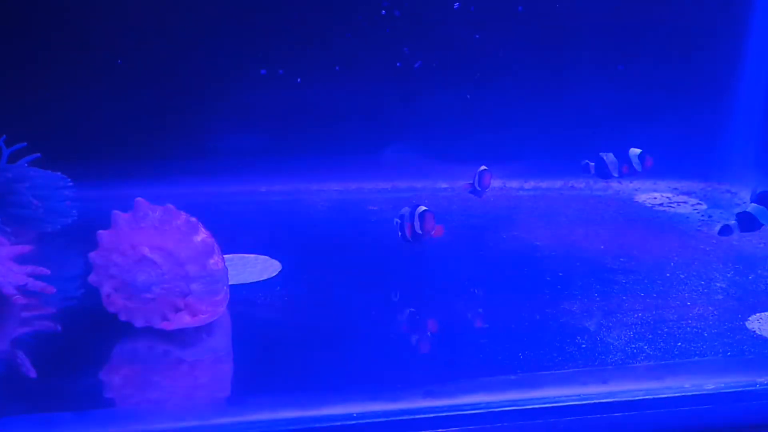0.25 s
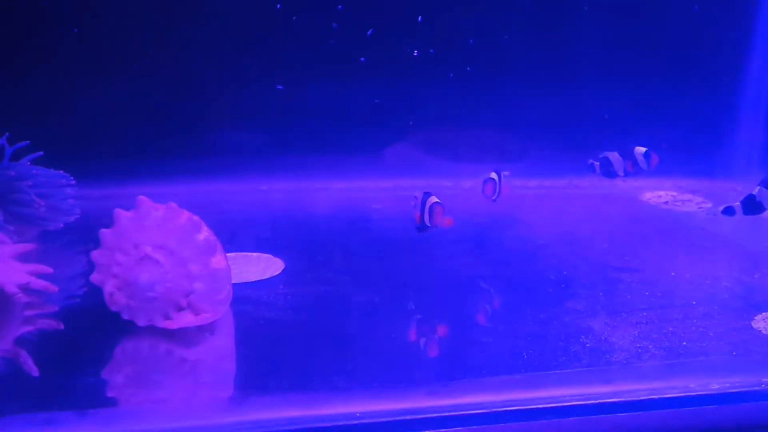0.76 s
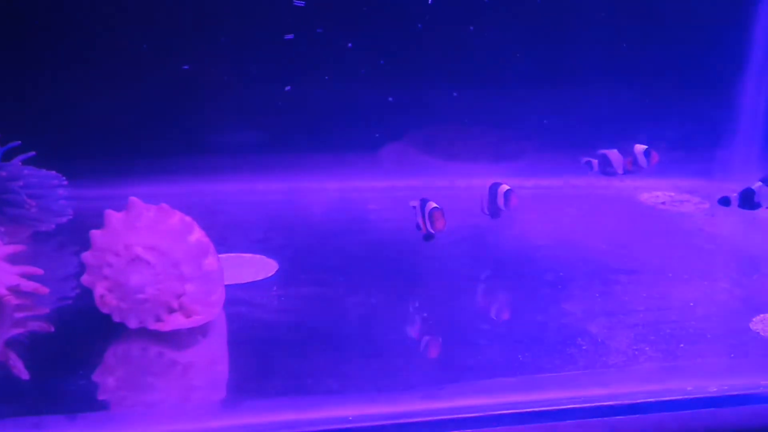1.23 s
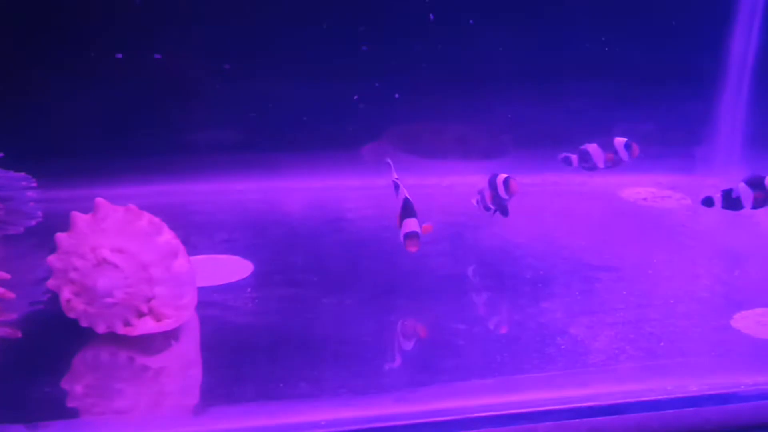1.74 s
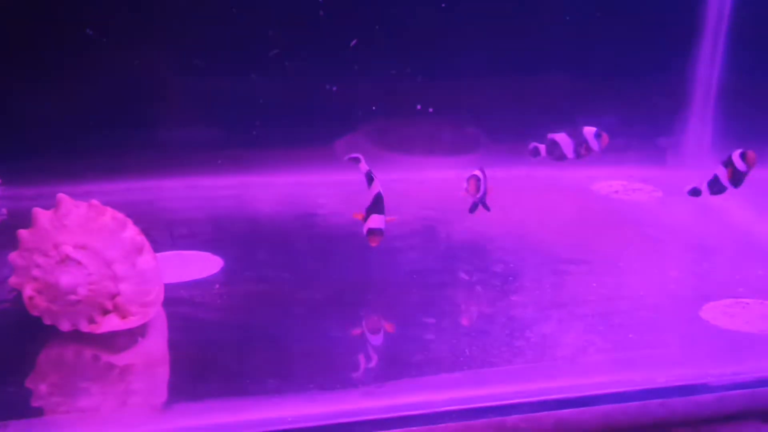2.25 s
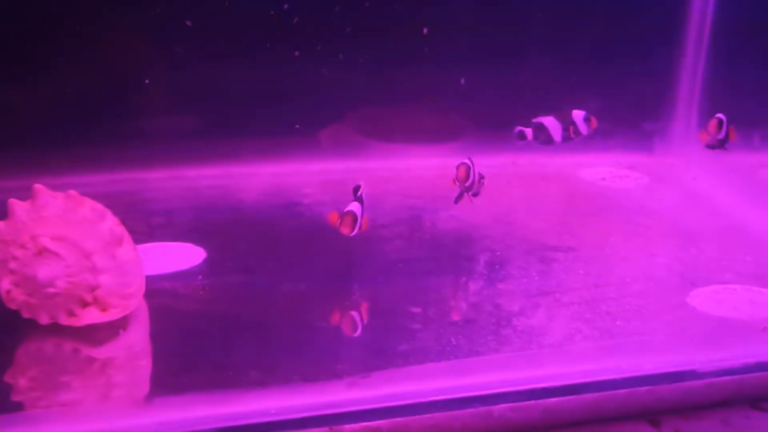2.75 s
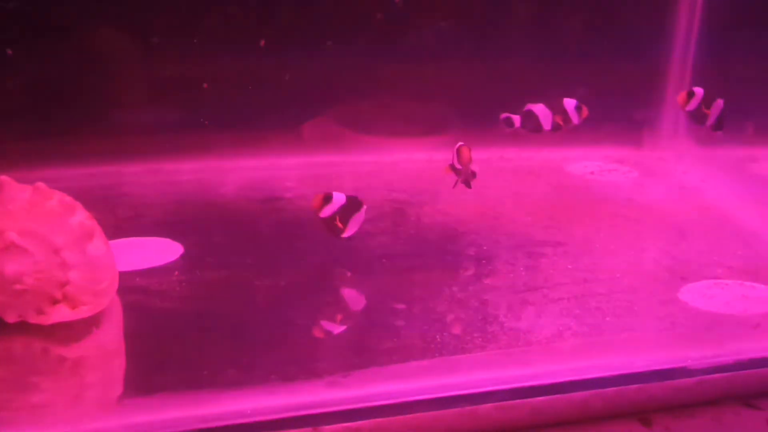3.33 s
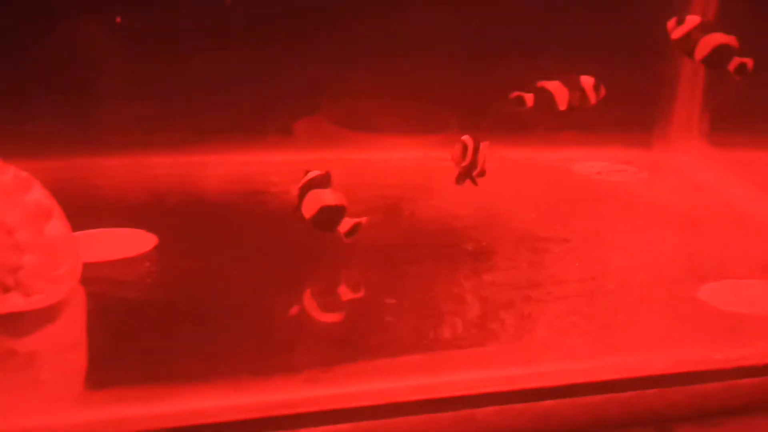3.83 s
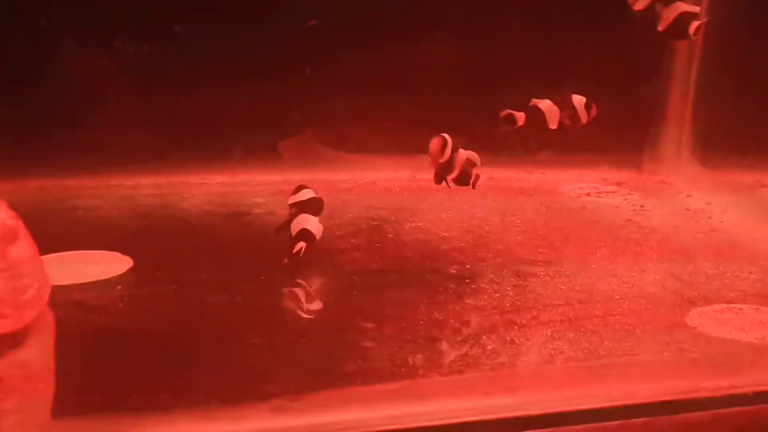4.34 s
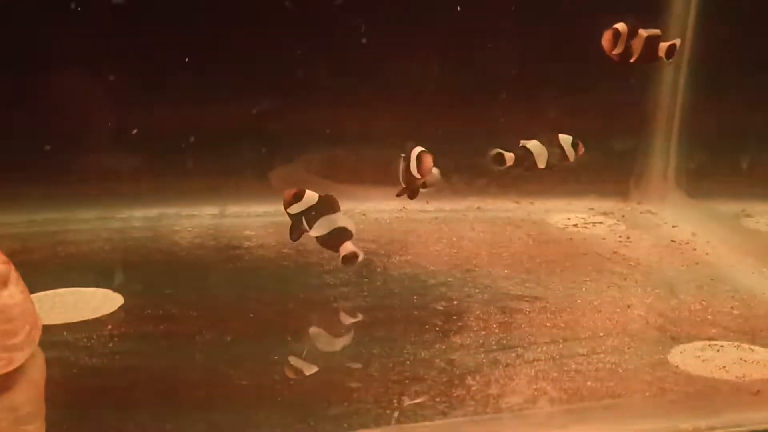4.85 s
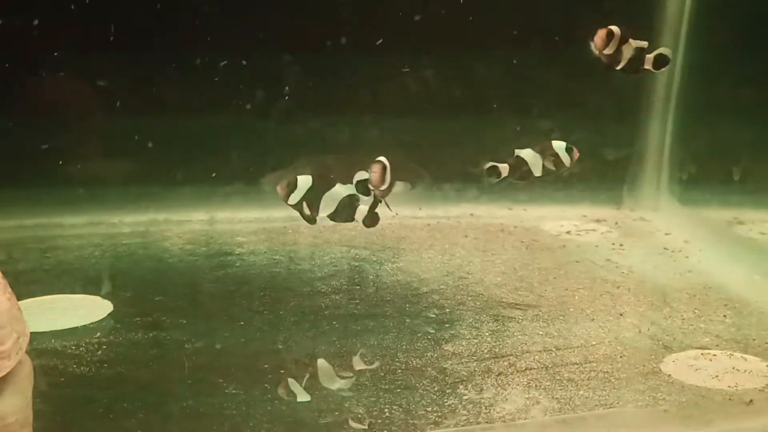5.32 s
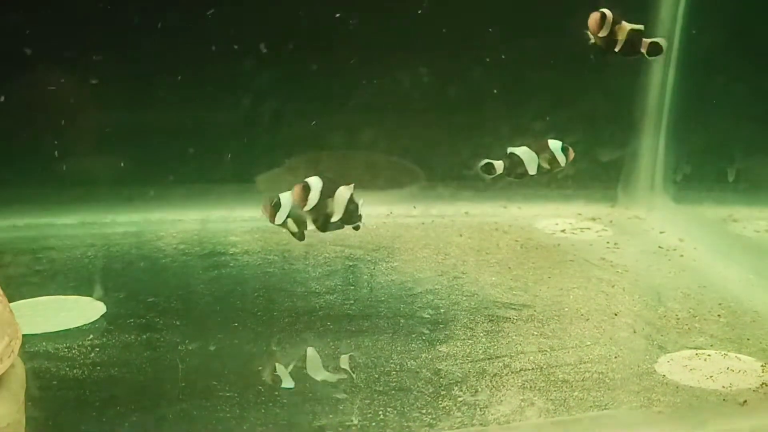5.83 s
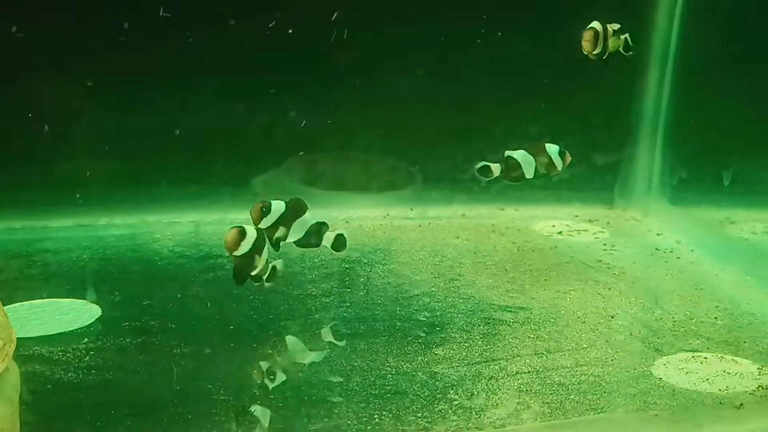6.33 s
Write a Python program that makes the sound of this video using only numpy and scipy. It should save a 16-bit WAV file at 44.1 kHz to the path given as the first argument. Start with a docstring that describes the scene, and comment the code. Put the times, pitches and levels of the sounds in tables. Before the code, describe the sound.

An aquarium pump hums steadily under rushing water, with a thin fluttering high whine, fizzing spray and small bubbles plinking close to the glass.

```python
"""An aquarium in a quiet room, heard close to the glass by one microphone.
From the start a pump and a slower motor hum in steady sines, under filtered noise for rushing water and fizz.
The water's rush and wash open strong and ease at once; small bubbles ping, and gurgles swell as bands of noise.
A thin resonant whine opens soft, its throb deepening over the first seconds; the loudest spray tick snaps at 1.1 s.
The wash slowly sinks as the fizz thickens in spits, the strongest of them at 6.3 s."""
import sys
import numpy as np
from scipy import signal
from scipy.fft import rfft, irfft
from scipy.io import wavfile

SR = 44100
rng = np.random.default_rng(int(sys.argv[2]) if len(sys.argv) > 2 else 0)


def wav_record(signal):
    """Record a signal, one row per channel, as 16-bit PCM in the file named by sys.argv[1]."""
    frames = np.transpose(np.atleast_2d(signal))
    bounded = np.clip(frames, -1, 1)
    # unit amplitude maps onto the largest positive 16-bit level
    quanta = np.round(bounded * 32767).astype(np.int16)
    wavfile.write(sys.argv[1], SR, quanta)


N = 290178
T = np.arange(N) / SR  # s
HZ = np.fft.rfftfreq(N, 1 / SR)


def amp(db):
    """Decibels to gain."""
    return 10 ** (np.asarray(db) / 20)


def evened(x):
    """Scales to rms 1."""
    return x / np.sqrt(np.mean(x ** 2) + 1e-20)


def spectrum(points):
    """Gain at every frequency, drawn through (Hz, dB) points on a log-frequency axis."""
    hz, db = np.transpose(points)
    return amp(np.interp(np.log(HZ + 1), np.log(hz), db))


def noise(gain):
    """White noise shaped to the given amplitude per root Hz."""
    return irfft(rfft(rng.standard_normal(N)) * gain, N) * np.sqrt(SR / 2)


def drift(rate):
    """Random wander of rms 1, rolled off steeply above rate [Hz]."""
    return evened(noise((HZ > 0) / (1 + (HZ / rate) ** 4)))


def settle(time_s):
    """Falls exponentially from 1 at the start towards 0."""
    return np.exp(-T / time_s)


def add(mix, s, sound):
    """Adds a sound at time s, cut off at the end of the mix."""
    part = mix[max(round(s * SR), 0):][:len(sound)]
    part += sound[:len(part)]


def room(x, wet_db, t60):
    """Direct sound plus dense reflections from the glass and the walls, dying by 60 dB in t60 [s]."""
    t = T[:SR // 2]
    signs = rng.choice([-1., 1.], len(t))
    taps = signs * (rng.random(len(t)) < .2) * (t > .001)
    tail = taps * np.exp(-np.log(1000) * t / t60)
    tail /= np.linalg.norm(tail)
    return x + amp(wet_db) * signal.fftconvolve(x, tail)[:N]


def tone(turns, db):
    """A sine of the given rms level and random phase, following a count of turns."""
    return np.sqrt(2) * amp(db) * np.sin(2 * np.pi * (turns + rng.random()))


# harmonics of the pump hum: (multiple of the mains, mean level [dB])
PUMP = [(1, -64), (2, -54.5), (3, -51), (4, -43), (5, -59.5), (6, -65), (12, -67)]


def pump():
    """Hum locked to the mains, its level wavering very slightly."""
    mains_hz = 60.135
    hum = sum(tone(k * mains_hz * T, db) for k, db in PUMP)
    return hum * amp(0.1 * drift(rate=1.8))


# harmonics of the motor buzz: (multiple of the shaft speed, level [dB])
MOTOR = [(3, -59), (4, -66), (6, -73), (8, -71), (10, -71), (11, -75), (12, -71), (13, -71), (14, -69),
         (16, -68), (17, -69), (18, -76), (19, -83), (20, -82), (21, -76), (24, -83), (29, -81), (30, -81),
         (32, -82), (33, -80), (36, -84), (37, -79), (38, -84), (40, -74), (41, -81), (42, -74), (43, -80),
         (47, -79), (48, -81), (52, -82)]


def motor():
    """Faint buzz of a slower motor: all harmonics follow one shaft, slightly unsteady in speed."""
    shaft_hz = 47.92 * (1 + 0.00011 * drift(rate=1.0))
    shaft_turns = np.cumsum(shaft_hz) / SR
    return sum(tone(k * shaft_turns, db) for k, db in MOTOR)


# weak tones close to machine harmonics: (pitch [Hz], level [dB])
BEATS = [(58.39, -70.5), (144.68, -65)]


def beats():
    """Weak steady sines that beat slowly against their neighbours."""
    return sum(tone(hz * T, db) for hz, db in BEATS)


# water driven through pipes and tank: (frequency [Hz], density before trim and easing [dB per Hz])
FLOW = [(20, -106), (60, -92.5), (133, -80), (160, -82.5), (185, -77), (275, -78.5), (315, -85.5),
        (430, -83), (510, -90.5), (610, -90), (690, -79), (850, -89), (1000, -98), (1600, -115)]


def flow():
    """Low rush of water as shaped noise, easing from a stronger start."""
    level_db = 0.15 + 5 * settle(time_s=0.39)
    return noise(spectrum(FLOW)) * amp(level_db)


# wash of the moving surface: (frequency [Hz], density before room, trim and easing [dB per Hz])
WASH = [(300, -115), (950, -91), (1230, -99), (1430, -90.5), (1650, -92), (2000, -93), (2400, -95),
        (4700, -97), (5900, -101), (8500, -106), (10000, -114), (15500, -116)]


def wash():
    """Gently swelling noise coloured by the glass box; eases from its start, then keeps sinking."""
    swelling = noise(spectrum(WASH)) * amp(1.3 * drift(rate=5.1))
    sag_db_per_s = 0.19
    level_db = -2.0 + 3.5 * settle(time_s=0.19) - sag_db_per_s * T
    return amp(level_db) * room(swelling, wet_db=-5.0, t60=0.06)


# resonances: (centre [Hz], width between points about 5 dB down [Hz], peak density before trim [dB per Hz])
WHINE = [(7020, 403, -82.5), (7340, 378, -82), (8010, 540, -97), (14900, 2700, -108)]


def whine():
    """Hiss held in two close resonances, a shoulder and an octave above, throbbing about nine times a second."""
    gain = 0
    for hz, width, db in WHINE:
        offset = 2 * (HZ - hz) / width
        gain = gain + amp(db) / (1 + offset ** 2 * (np.sqrt(2) - 1)) ** 1.75
    throb_hz = 9.4 + 0.71 * drift(rate=0.52)
    throb_turns = np.cumsum(throb_hz) / SR
    depth_db = 2 * (1 - settle(time_s=0.97))
    throb_db = depth_db * np.cos(2 * np.pi * throb_turns)
    # soft start, then settles
    level_db = 1.0 - 2.5 * settle(time_s=2.9)
    return noise(gain) * amp(level_db + throb_db + .5 * drift(rate=66))


# fizz of the finest spray: (frequency [Hz], density before trim, rise and flicker [dB per Hz])
FIZZ = [(3000, -120), (7000, -104), (8400, -100), (9800, -111), (12600, -109.5), (13600, -101.5),
        (15400, -101)]
# strongest spits: (time [s], power added at onset, relative to the density above [dB])
SPITS = [(1.728, 4), (2.423, 5), (2.779, 3), (3.99, 7.5), (4.639, 5), (5.067, 4), (6.345, 14)]


def fizz():
    """Flickering high noise that slowly thickens, briefly lifted by dying spits of spray."""
    rise_db_per_s = 0.43
    flicker_db = 2.25 * drift(rate=22) + 1.6 * drift(rate=100)
    power = amp(-1.84 + rise_db_per_s * T + flicker_db) ** 2
    for s, db in SPITS:
        add(power, s, (amp(db) * settle(time_s=0.078)) ** 2)
    return noise(spectrum(FIZZ)) * np.sqrt(power)


def ping(hz, t60, rise):
    """A bubble rings briefly, its pitch rising by the share rise as it nears the surface."""
    t = T[:SR // 16]
    age = np.minimum(t / t60, 1)
    turns = np.cumsum(hz * (1 + rise * age)) / SR
    envelope = np.exp(-np.log(1000) * t / t60) * (1 - np.exp(-t * hz))
    return np.sin(2 * np.pi * turns) * envelope


def swarm(low_hz, high_hz, per_s, spread_db, t60, count):
    """Bubbles at random times on count pitches, a few much louder than the rest; rms 1 overall."""
    out = np.zeros(N)
    for hz in np.geomspace(low_hz, high_hz, count):
        size = amp(spread_db * np.minimum(rng.exponential(1, N), 3))
        births = size * (rng.random(N) < per_s / count / SR)
        out += signal.oaconvolve(births, ping(hz, t60, rise=0.025))[:N]
    return evened(out)


def small_bubbles():
    """A crowd of soft, very short pings, mostly heard through reflections."""
    small = amp(-70.5) * swarm(2400, 5420, per_s=110, spread_db=4.0, t60=0.0031, count=30)
    return room(small, wet_db=6.5, t60=0.36)


def burst(s, hz, width_hz):
    """A tick: a few cycles under a bell-shaped envelope, shorter when wider."""
    t = T - s
    return np.cos(2 * np.pi * hz * t) * np.exp(-np.minimum((2 * width_hz * t) ** 2, 50))


# sharp ticks of bursting spray: (time [s], peak level before room [dB], pitch [Hz], width [Hz])
TICKS = [(1.109, -28, 8100, 1310), (1.1152, -41, 8260, 1110), (1.4212, -45, 8200, 700),
         (2.4009, -43, 7900, 900), (4.8314, -41, 14400, 1800), (4.9945, -43, 14500, 1800),
         (5.7359, -40, 14500, 1600), (6.0282, -42, 8000, 800), (6.345, -36, 11800, 4500)]


def spray_ticks():
    """The tiniest bubbles burst: a swarm of very high pings, joined by single sharp ticks."""
    out = amp(-79) * swarm(7150, 8200, per_s=44, spread_db=8, t60=0.0089, count=6)
    out += sum(amp(db) * burst(s, hz, width_hz) for s, db, hz, width_hz in TICKS)
    return room(out, wet_db=3.5, t60=0.43)


def gurgle(centre_hz):
    """Many like-sized bubbles blur into a narrow band of noise that swells and dies away."""
    t = T[:SR // 3]
    width, attack_s, decay_s = 0.15, 0.0021, 0.12  # width as a share of the pitch
    offset = np.fft.rfftfreq(len(t), 1 / SR) / centre_hz - 1
    band = 1 / (1 + (offset / width) ** 2)
    envelope = (1 - np.exp(-t / attack_s)) * np.exp(-t / decay_s)
    return envelope * evened(irfft(rfft(rng.standard_normal(len(t))) * band, len(t)))


def trickle():
    """Soft gurgles follow one another loosely, one at a random moment in each equal slot."""
    out = np.zeros(N)
    slots_per_s = 3.3
    for k, (lag, size, pitch) in enumerate(rng.random(size=(40, 3))):
        hz = 3800 + 1100 * pitch
        level_db = -62.25 + size
        add(out, (k + lag) / slots_per_s, amp(level_db) * gurgle(hz))
    return out


# clearest single bubbles: (time [s], level before ping envelope and room [dB], starting pitch [Hz])
BUBBLES = [(.195, -48.5, 2750), (1.301, -50.5, 2820), (2.1518, -44.5, 1590), (2.416, -41.5, 1930),
           (2.6188, -44, 2690), (3.022, -48, 4270), (3.412, -49, 2930), (4.9137, -43.5, 3030),
           (5.0782, -49, 2490), (5.224, -50, 3170), (5.819, -48, 2940)]


def large_bubbles():
    """Plinks of larger bubbles, which ring longer and sound nearer."""
    large = np.zeros(N)
    for s, db, hz in BUBBLES:
        add(large, s, amp(db) * ping(hz, t60=0.035, rise=0.05))
    return room(large, wet_db=1.0, t60=0.41)


# loudest gurgles, each a cluster of bubbles: (time [s], rms level before envelope [dB], centre [Hz])
GURGLES = [(.929, -61, 4720), (1.721, -55.5, 4370), (2.495, -60, 5600), (2.7, -56.5, 3680),
           (2.905, -57, 4800), (3.207, -59, 4100), (4.235, -56.5, 4020), (5.565, -60, 4020),
           (5.795, -56, 4600)]


def loud_gurgles():
    """Louder clusters of bubbles stand out from the trickle."""
    out = np.zeros(N)
    for s, db, hz in GURGLES:
        add(out, s, amp(db) * gurgle(hz))
    return out


def scene():
    """Everything reaches one microphone, alike in both channels."""
    machines = pump() + motor() + beats()
    water = flow() + wash()
    spray = fizz() + spray_ticks()
    bubbles = small_bubbles() + trickle() + large_bubbles() + loud_gurgles()
    mono = machines + water + whine() + spray + bubbles
    return np.array([mono, mono])


def record(dry):
    """The recorder's steep band limit: a long linear-phase low-pass."""
    edge_hz = 15520
    lowpass = signal.firwin(1023, edge_hz, window=("kaiser", 9), fs=SR)
    return signal.oaconvolve(dry, lowpass[None], "same")


dry = scene()
out = record(dry)
wav_record(out)
```